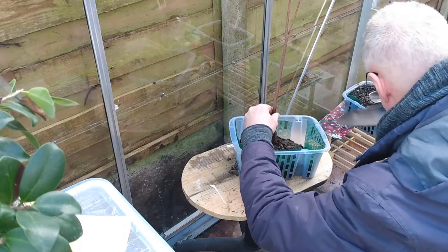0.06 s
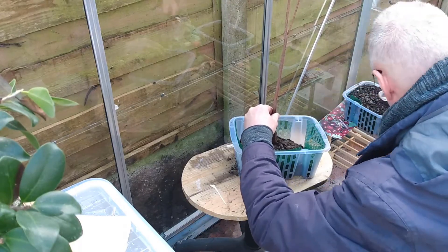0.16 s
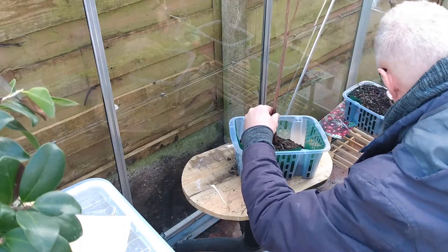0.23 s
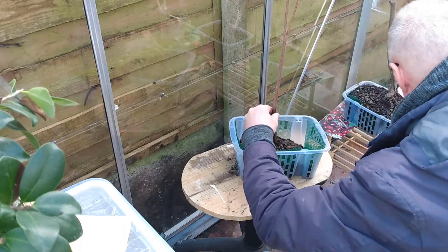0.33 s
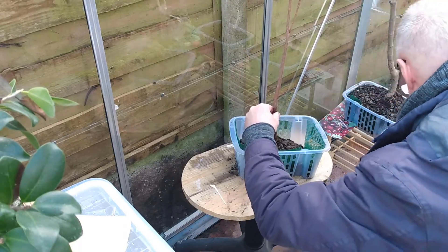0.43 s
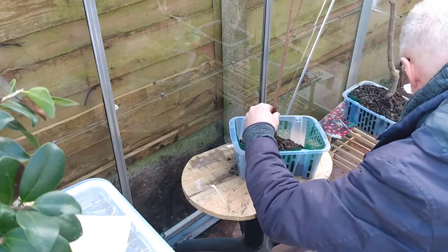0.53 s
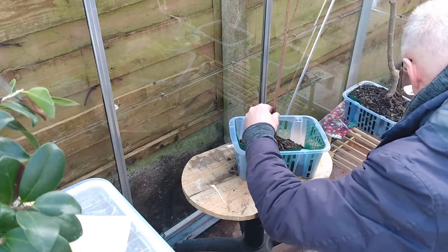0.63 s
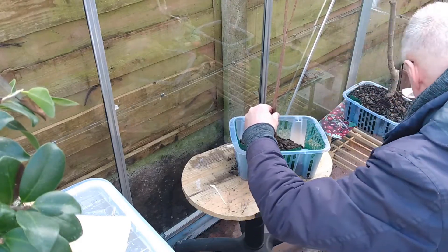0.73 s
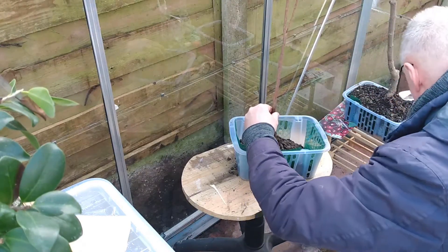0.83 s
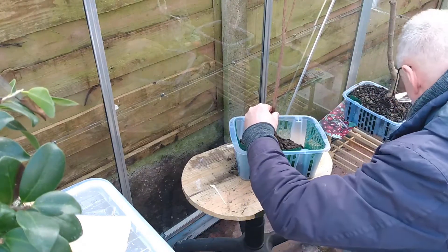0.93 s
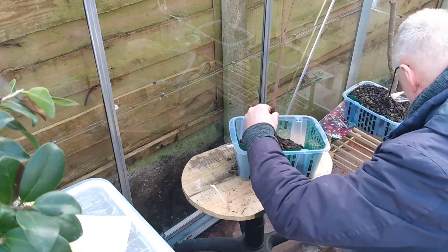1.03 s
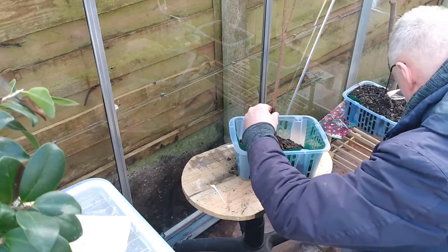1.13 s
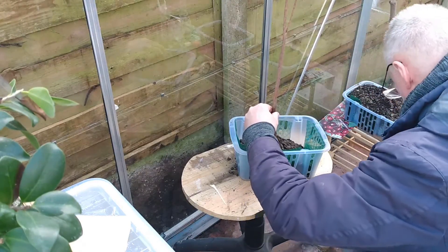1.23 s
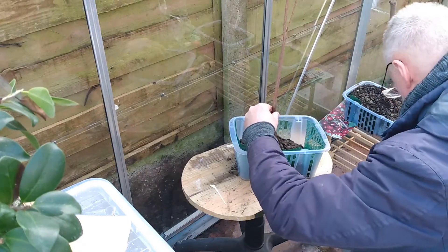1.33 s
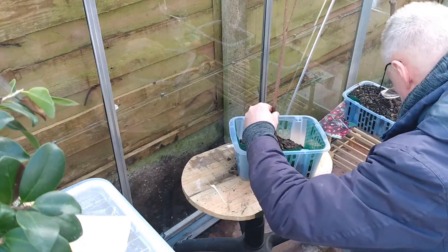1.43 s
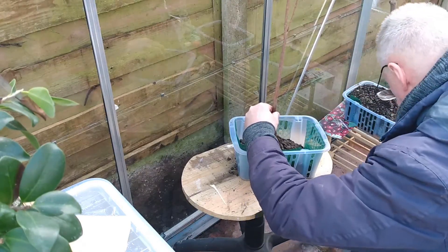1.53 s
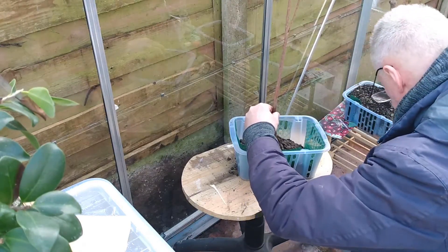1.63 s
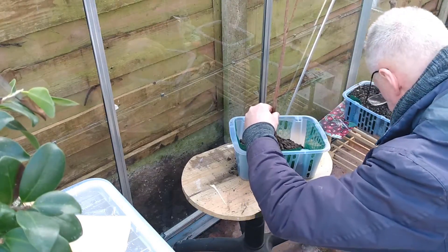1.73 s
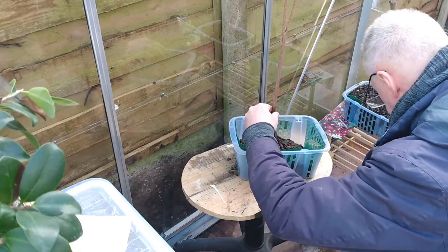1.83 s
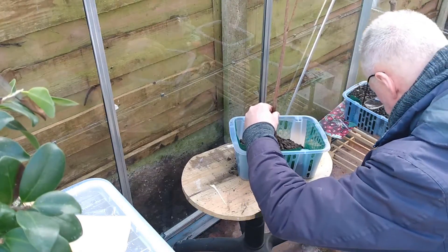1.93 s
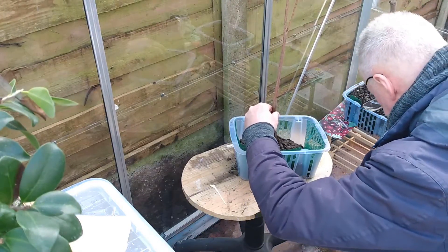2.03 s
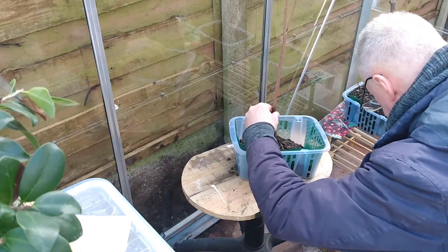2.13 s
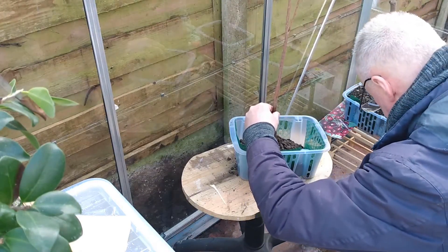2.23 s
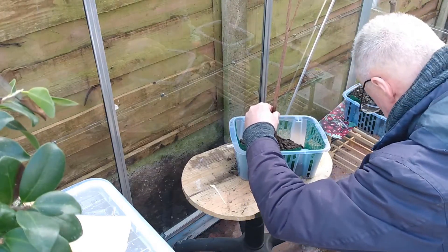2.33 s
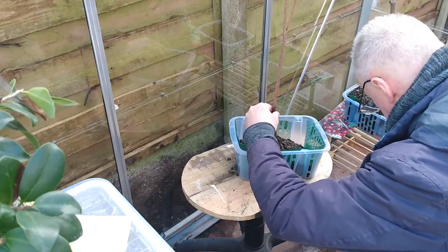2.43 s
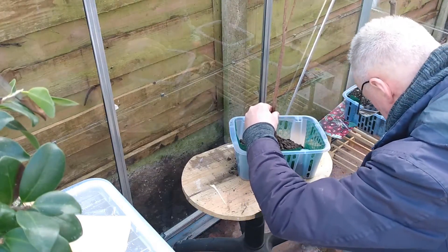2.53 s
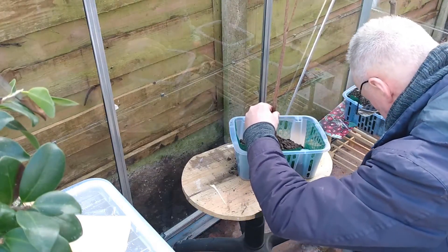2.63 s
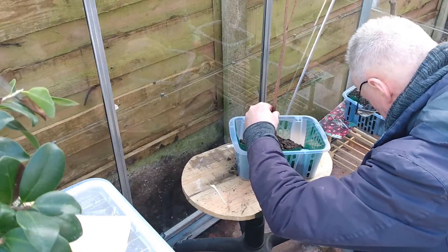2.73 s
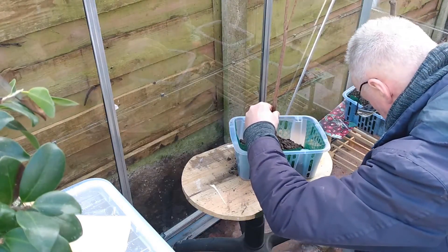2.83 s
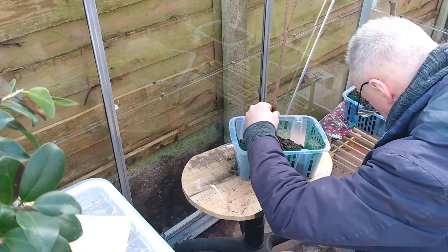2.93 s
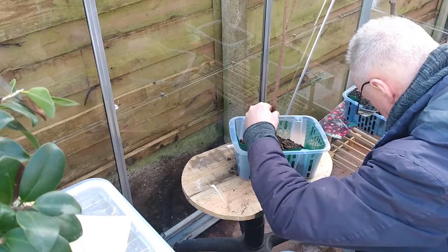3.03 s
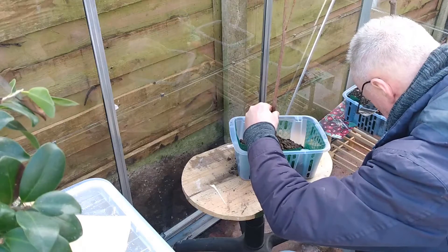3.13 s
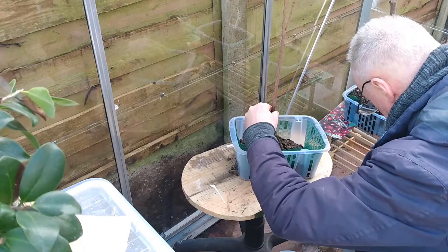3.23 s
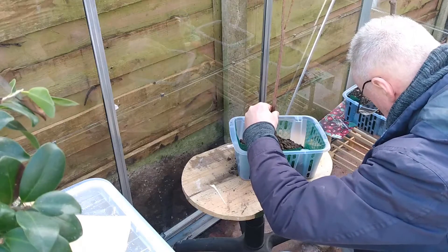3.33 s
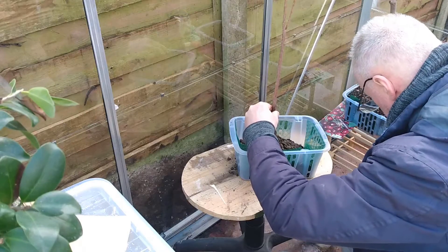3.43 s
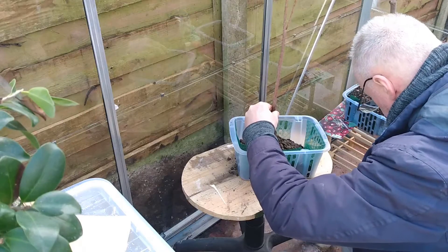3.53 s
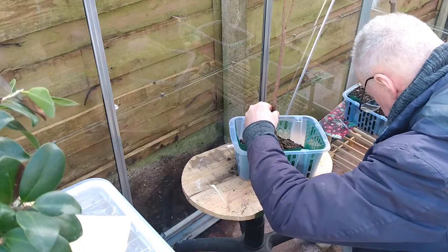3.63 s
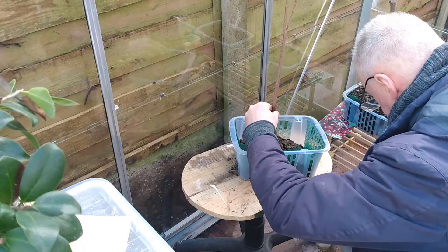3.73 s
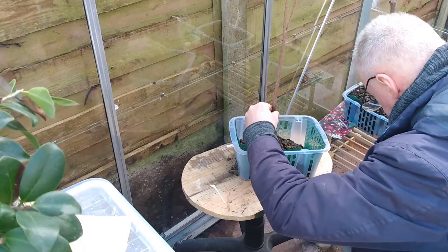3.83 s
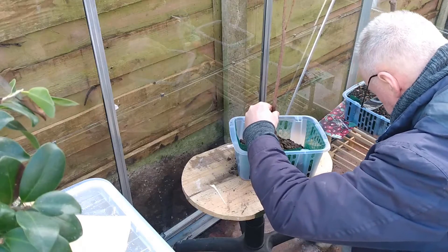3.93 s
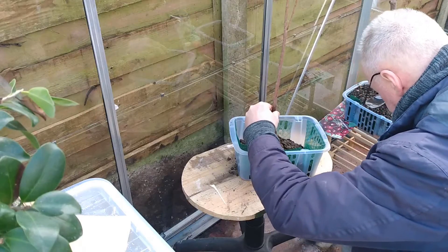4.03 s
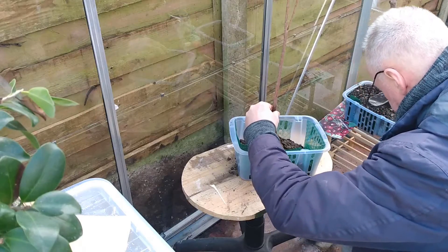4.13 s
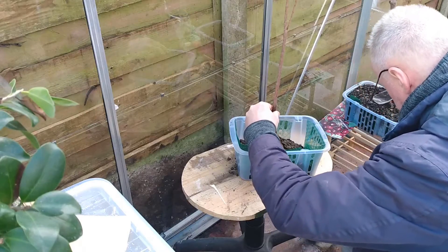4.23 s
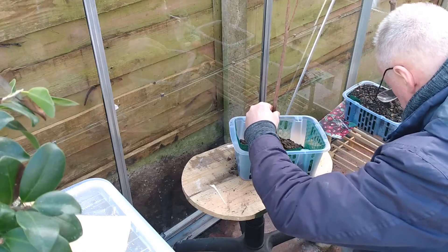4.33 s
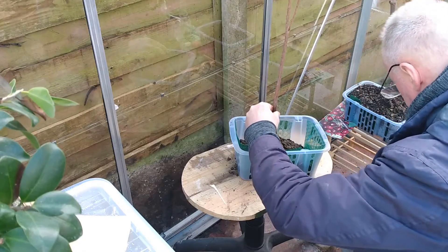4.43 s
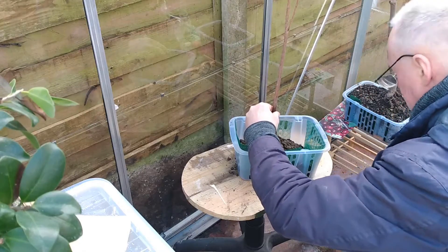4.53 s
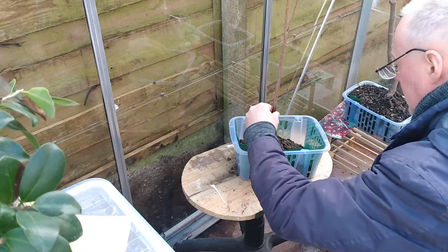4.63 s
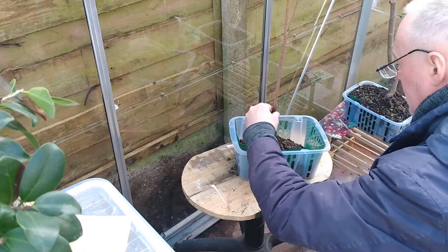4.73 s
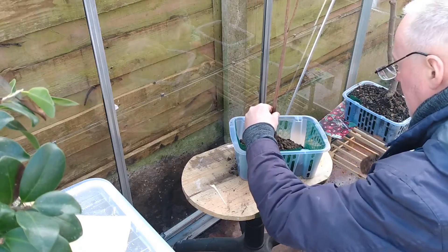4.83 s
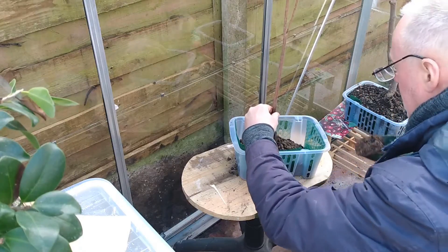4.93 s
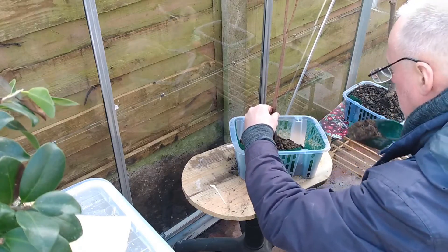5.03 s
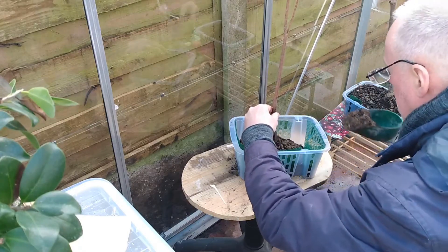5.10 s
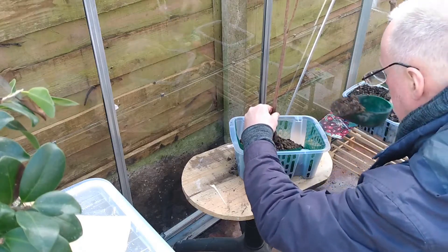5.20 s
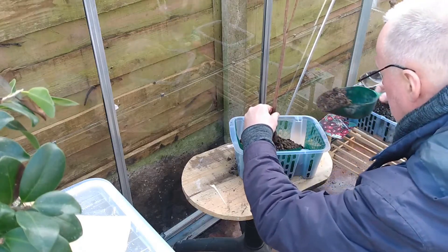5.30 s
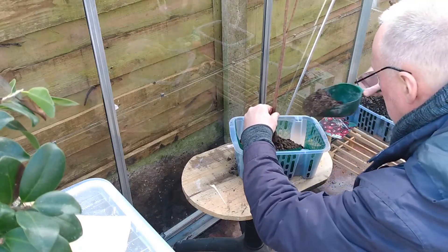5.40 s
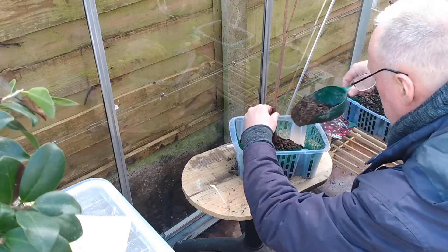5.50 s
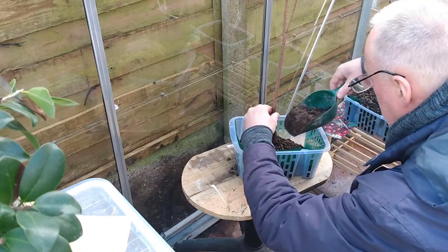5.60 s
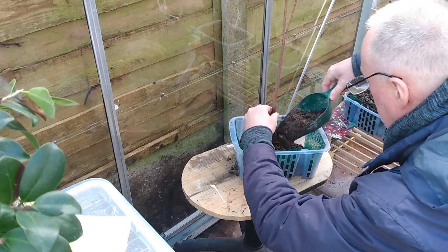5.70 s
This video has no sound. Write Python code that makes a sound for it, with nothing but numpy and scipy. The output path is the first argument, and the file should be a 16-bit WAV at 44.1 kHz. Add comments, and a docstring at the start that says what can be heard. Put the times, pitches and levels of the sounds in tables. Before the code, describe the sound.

A gardener shifts their feet and rubs a sleeve, bumps a plastic basket once, then works a plastic scoop through coarse soil. Dense crunching bursts in the middle give way to lighter, drier grit shifting and sharp plastic taps as the scoop lifts. Stray stones click at the end. Heard fairly close in stereo, in a small, bright-ringing glass enclosure with quiet background rumble.

```python
"""Low rumble, faint air, shuffling feet and a swishing jacket sleeve open the scene in a small glass greenhouse.
A plastic scoop then digs gritty potting soil out of a plastic basket: it taps, knocks and crunches in,
is lifted with grit sliding in its bowl, and sheds a few stones. Bursts of random grains drive resonances
and spectra for soil, soles and cloth; single clicks ring the plastic; stones are short damped sines.
The panes wrap everything except the rumble in a short, bright ring."""
import sys
import numpy as np
from scipy import signal
from scipy.fft import rfft, irfft
from scipy.io import wavfile
from scipy.ndimage import uniform_filter1d

SR = 44100
rng = np.random.default_rng(int(sys.argv[2]) if len(sys.argv) > 2 else 0)


def wrap_up_sound(samples):
    """Save the sound to the file named by the first command line argument, as 16-bit audio."""
    columns = np.atleast_2d(samples).T
    # keep every value between -1 and 1, then stretch to whole-number steps
    tamed = np.clip(columns, -1, 1)
    steps = np.round(tamed * 32767).astype(np.int16)
    wavfile.write(sys.argv[1], SR, steps)


N = 254016
TIME = np.arange(N) / SR
# All level_db columns are relative: each function adds its own trim or normalises the result.


def from_db(db):
    """Decibels to gain."""
    return 10 ** (np.asarray(db) / 20)


def unit(h):
    """Scale a response to an energy of one."""
    return h / np.sqrt(np.sum(h ** 2, axis=-1, keepdims=True) + 1e-30)


def at_hz(points, hz):
    """Read a table along a log-frequency axis."""
    freq_hz, value = np.transpose(points)
    return np.interp(np.log(np.maximum(hz, 1)), np.log(freq_hz), value)


def through(x, response):
    """Pass a sound through an impulse response."""
    return signal.fftconvolve(x, response, axes=-1)[..., :N]


def colour(spectrum, size=4096):
    """Causal (minimum-phase) response with the given spectrum."""
    level_db = at_hz(spectrum, np.fft.rfftfreq(size, 1 / SR))
    cepstrum = irfft(np.log(from_db(level_db)))
    # fold the cepstrum forward so that the energy comes as early as possible
    cepstrum[1:size // 2] *= 2
    cepstrum[size // 2 + 1:] = 0
    return unit(irfft(np.exp(rfft(cepstrum))))


def body(modes):
    """Response of a struck thing: damped sines, each holding its share of the energy."""
    t = TIME[:SR // 4]
    response = np.zeros(len(t))
    for k, (hz, width_hz, db) in enumerate(modes):
        ring = np.exp(-np.pi * width_hz * t) * np.sin(2 * np.pi * hz * t)
        response += (-1) ** k * from_db(db) * unit(ring)  # alternating polarity
    return unit(response)


def cut(x, hz, kind, order=2):
    """Butterworth low- or high-pass."""
    return signal.sosfilt(signal.butter(order, hz, kind, fs=SR, output="sos"), x)


def steadied(x):
    """Even out the level of a ringing sound, to a power of about one."""
    return x / np.sqrt(np.abs(uniform_filter1d(x ** 2, SR // 25)) + 1e-12)


def grains(per_s, spread_db):
    """Random tiny fractures of exponentially spread level, with a local mean power of about one."""
    sizes = from_db(spread_db * np.minimum(rng.exponential(1, N), 4)) * rng.choice([-1, 1], N)
    clicks = sizes * (rng.random(N) < per_s / SR)
    power = np.abs(uniform_filter1d(clicks ** 2, SR // 20))
    return clicks / np.sqrt(power + 0.09 * np.mean(clicks ** 2))


def flicker(depth_db, per_s):
    """A randomly wavering gain with a mean power of one."""
    gain = from_db(depth_db * np.interp(TIME * per_s, np.arange(2000), rng.standard_normal(2000)))
    return unit(gain) * np.sqrt(N)


def gesture(start, rise, hold, release_s):
    """Force of one movement: it builds steadily, holds, then dies away."""
    age = TIME - start
    return np.clip(age / rise, 0, 1) * np.exp(-np.clip((age - rise - hold) / release_s, 0, 20))


def forces(rows, release_s):
    """Add up a table of movements in power: one force curve for each of its level columns."""
    rows = np.array(rows)
    shapes = np.array([gesture(*row[:3], release_s) for row in rows])
    return np.sqrt(from_db(rows[:, 3:].T) ** 2 @ shapes ** 2)


def blows(times, db):
    """One click for each contact."""
    clicks = np.zeros(N)
    clicks[np.round(np.asarray(times) * SR).astype(int)] = from_db(db)
    return clicks


GRAZE_S, GRAZE_DB = .005, -6  # length of the swell, its energy against the click


def grazed(clicks):
    """Lead each click in with a brief swell: grit on the plastic touches just ahead of the blow."""
    ahead = TIME[:SR // 50][::-1]  # time left until the blow
    swell = unit(rng.standard_normal(len(ahead)) * np.clip(1 - ahead / GRAZE_S, 0, 1))
    return clicks + from_db(GRAZE_DB) * signal.fftconvolve(clicks, swell)[len(ahead) - 1:]


# ring of the greenhouse: [pitch_hz, t60_s]
GREENHOUSE_RING = [(100, 0.17), (260, 0.52), (480, 0.49), (760, 0.3), (1800, 0.28), (5000, 0.28),
                   (9000, 0.27), (15000, 0.26)]
# stereo width of the ring: [pitch_hz, left-right likeness (0 unrelated - 1 alike)]
EAR_LIKENESS = [(60, 1), (180, 1), (290, 0.39), (480, 0.49), (800, 0), (2000, 0), (16000, 0.075)]
BUILD_S = 0.00031  # the reflections take a moment to gather


def greenhouse(x, direct_db, left_db):
    """A direct path, then dense reflections from the panes that die away band by band."""
    t, edges = TIME[:SR // 2], np.geomspace(20, 19000, 15)
    white, hz = rfft(rng.standard_normal((2, len(t)))), np.fft.rfftfreq(len(t), 1 / SR)
    response = np.zeros((2, len(t)))
    for low, high in zip(edges, edges[1:]):
        centre = np.sqrt(low * high)
        fade = (1 - np.exp(-t / BUILD_S)) * from_db(-60 * t / at_hz(GREENHOUSE_RING, centre))
        band = irfft(white * ((hz >= low) & (hz < high)), len(t))
        mid, side = unit(band * fade)
        alike = np.clip(at_hz(EAR_LIKENESS, centre), -.99, .99)
        ears = unit(np.sqrt(1 + alike) * mid + np.sqrt(1 - alike) * side * [[1], [-1]])
        response += ears * np.sqrt(2 * (high - low) / SR)
    # the work lies to the right, so the direct sound reaches the left a few samples later
    response[[0, 1], [rng.integers(1, 8), 0]] += from_db(direct_db)
    balance = from_db([[left_db / 2], [-left_db / 2]])
    return through(x[None], unit(response) * balance)


def wandering(x, direct_db, left_db, count):
    """The sounding spot shifts among several places, each with its own pattern of reflections."""
    moments = np.arange(0, 6, 1 / 40)
    shares = np.array([np.interp(TIME, moments, row) for row in rng.standard_normal((count, len(moments)))])
    shares = np.abs(shares) / np.sqrt(np.sum(shares ** 2, axis=0))
    return sum(greenhouse(x * share, direct_db, left_db) for share in shares)


# swell and ebb of the deep rumble: [time_s, level_db]
RUMBLE_LEVEL = [(0.0, -67.5), (1.78, -62), (2.45, -64), (3.06, -75), (3.4, -61), (4.1, -74), (5.76, -75)]
# spectrum of the air, with a thin band of hiss: [pitch_hz, level_db per Hz]
AIR_SPECTRUM = [(30, -16.5), (70, -14), (110, -3.5), (180, -17), (400, -27), (900, -24.5), (1100, -36.5),
                (1250, -3.5), (1400, -16.5), (1650, -34.5), (2000, -35.5), (2300, -24), (2800, -32.5),
                (3200, -23.5), (3700, -45), (16000, -24.5)]
AIR_WAVER_DB, AIR_WAVERS_PER_S = 2.0, 14  # the faint hiss wavers


def background():
    """A deep rumble, alike in both ears, and faint air with a thin band of hiss in it."""
    rumble = cut(cut(rng.standard_normal(N), hz=51.7, kind="low"), hz=36, kind="high", order=3)
    rumble_db = np.interp(TIME, *np.transpose(RUMBLE_LEVEL)) + 1.5
    rumble = unit(rumble) * np.sqrt(N) * from_db(rumble_db)
    air = from_db(-65.5) * through(rng.standard_normal(N), colour(AIR_SPECTRUM))
    air = air * flicker(AIR_WAVER_DB, AIR_WAVERS_PER_S)
    return rumble + greenhouse(air, direct_db=-10, left_db=-2.0)


# shifts of the feet: [start_s, rise_s, hold_s, thud_level_db, scuff_level_db]
FOOT_SHIFTS = [(0.0, 0.0071, 0.031, -49, -65.5), (.095, 0.016, 0.022, -44, -60.5),
               (.155, 0.053, 0.07, -48, -50.5), (.28, 0.024, 0.076, -53, -57.5),
               (.385, 0.0079, 0.021, -48.5, -67), (.735, 0.0053, 0.034, -53, -75),
               (1.39, 0.027, 0.062, -50, -59.5)]
# swishes of the sleeve on the jacket: [start_s, rise_s, hold_s, level_db]
SLEEVE_SWISHES = [(0.0, 0.0033, 0.036, -60), (.15, 0.14, 0.098, -51.5), (.7, 0.071, 0.18, -54.5),
                  (1.0, 0.057, 0.35, -52.5), (1.4, 0.054, 0.032, -45.5), (5.43, 0.059, 0.19, -64)]
# spectra of sole thud, sole scuff and sleeve weave: [pitch_hz, level_db per Hz]
THUD_SPECTRUM = [(20, -27), (45, -7), (70, -22), (110, 6), (170, 1), (260, -14.5), (500, -32), (1200, -53)]
SCUFF_SPECTRUM = [(120, -19.5), (260, -1.5), (450, -0.5), (650, -2), (900, -9), (1500, -15.5),
                  (3000, -23.5), (8000, -54)]
CLOTH_SPECTRUM = [(500, -29), (2000, -2.5), (4500, -1.5), (7000, -1.5), (10000, 4), (13500, 2.5),
                  (16500, -2.5)]
FOOT_RELEASE_S, SLEEVE_RELEASE_S = .035, 0.058


def gardener():
    """Soles thud and scuff on the floor; the weave of the sleeve hisses as it slides."""
    weight, drag = forces(FOOT_SHIFTS, FOOT_RELEASE_S)
    rub, = forces(SLEEVE_SWISHES, SLEEVE_RELEASE_S)
    thud = through(weight * grains(per_s=400, spread_db=-3.0), colour(THUD_SPECTRUM))
    scuff = through(drag * grains(per_s=1500, spread_db=-1.0), colour(SCUFF_SPECTRUM))
    swish = through(rub * grains(per_s=6300, spread_db=-1.5), colour(CLOTH_SPECTRUM))
    return thud + scuff + from_db(-2.5) * swish


# light blows on the scoop: [time_s, crack_level_db, hollow_level_db, wall_level_db]
SCOOP_TAPS = [(1.0059, -31.5, -32.5, -28), (1.1614, -23, -22, -50), (1.6918, -24.5, -40.5, -32.5),
              (1.852, -40, -72, -38.5), (1.9697, -37.5, -26, -23), (2.1625, -9.5, -21, -13),
              (2.4693, -20.5, 0, -14), (2.9061, -17, -14.5, -7.5), (3.3315, -28, -10, -50),
              (3.5802, -31, -9, -51), (4.184, -33, -39, -25), (4.2526, -17.5, -45, -24),
              (4.514, -7.5, -36.5, -15), (4.763, -13, -51, -26), (5.1344, -42, -77, -41)]
# spectrum of crunching grit, also the crack of a tap: [pitch_hz, level_db per Hz]
CRUNCH_SPECTRUM = [(300, -32.5), (900, -5.5), (2000, 5.5), (3500, 1), (5000, 0), (6500, -1), (8500, -0.5),
                   (12000, -3.5), (15000, -3.5), (16500, -26.5)]
# resonances of the free scoop wall, its empty bowl and the basket: [pitch_hz, width_hz, level_db]
FREE_SCOOP_MODES = [(764, 200, -7), (1183, 420, -3), (1520, 130, -0.5), (1817, 250, -4.5),
                    (2280, 490, -0.5), (2910, 160, -5)]
EMPTY_BOWL_MODES = [(446, 18, 2), (227, 25.6, -18.5)]
BASKET_MODES = [(81, 92, -15), (98, 17, -7.5), (156.8, 7, -4), (220.6, 30, -2.5), (271, 14, 0.5),
                (327.3, 27, -0.5), (398, 48, -1), (439.5, 8.2, 0.5)]
FILLED_S = 2.1  # from this moment on the bowl holds soil


def taps():
    """Each blow cracks and rings the scoop wall; the empty bowl sounds hollow, the filled one thumps the basket."""
    s, crack_db, hollow_db, wall_db = np.transpose(SCOOP_TAPS)
    crack = through(grazed(blows(s, crack_db + 15.5)), colour(CRUNCH_SPECTRUM))
    wall = through(grazed(blows(s, wall_db + 17.5)), body(FREE_SCOOP_MODES))
    bowl = through(blows(s, hollow_db + 24) * (TIME < FILLED_S), body(EMPTY_BOWL_MODES))
    thump = through(blows(s, hollow_db + 8.5) * (TIME >= FILLED_S), body(BASKET_MODES))
    return crack + wall + cut(bowl, hz=181, kind="high") + cut(thump, hz=70, kind="high")


# pushes and shakes of the scoop: scrape on its wall, crunch of grit, shove of clods
# [start_s, rise_s, hold_s, scrape_level_db, crunch_level_db, shove_level_db]
SCOOP_PUSHES = [ (1.02, 0.036, 0.031, -46.5, -52.5, -58), (1.48, 0.014, 0.008, -53, -52, -61),
                (1.607, 0.018, 0.019, -35, -46, -47), (1.67, 0.016, 0.014, -41.5, -47.5, -45.5),
                (1.78, 0.013, 0.07, -53.5, -52.5, -79), (1.961, 0.014, 0.064, -36.5, -34.5, -33),
                (2.04, 0.061, 0.028, -30.5, -26, -33.5), (2.135, 0.029, 0.029, -30.5, -32, -25),
                (2.23, 0.037, 0.039, -24, -26.5, -27.5), (2.35, 0.04, 0.097, -44.5, -52.5, -34.5),
                (2.463, 0.0068, 0.088, -21.5, -19.5, -23), (2.57, 0.031, 0.099, -31, -35, -30),
                (2.69, 0.083, .06, -28, -33.5, -47), (2.775, 0.064, .05, -23, -25, -33.5),
                (2.92, 0.054, 0.2, -33.5, -39, -49), (3.12, 0.022, 0.14, -31.5, -36, -41),
                (3.305, 0.021, 0.078, -37, -32.5, -31.5), (3.43, 0.025, 0.028, -30, -30.5, -32),
                (3.577, 0.005, 0.037, -35, -32, -30.5), (3.63, 0.059, 0.13, -36.5, -34.5, -38.5),
                (3.83, 0.047, 0.015, -21, -23, -30), (3.91, 0.033, 0.12, -42.5, -39.5, -43.5),
                (4.1, 0.03, 0.092, -40.5, -37, -54), (4.235, 0.023, 0.046, -35, -34, -47.5),
                (4.315, 0.017, 0.08, -32.5, -29, -46), (4.415, 0.023, .012, -31, -21.5, -42.5),
                (4.505, .012, 0.068, -35, -39, -42.5), (4.62, 0.054, 0.12, -51.5, -45.5, -69),
                (4.754, 0.011, .017, -30.5, -35, -57), (4.805, 0.013, 0.014, -41, -27.5, -49.5),
                (4.926, .01, 0.0053, -30, -31.5, -59), (4.958, .012, 0.014, -62, -48.5, -49), ]
PUSH_RELEASE_S = .012  # the soil settles this fast once a push ends


def pushes():
    """Forces of scraping, crunching and shoving as the scoop works the soil."""
    return forces(SCOOP_PUSHES, PUSH_RELEASE_S)


# how far the scoop is out of the soil: [time_s, freedom (0 buried - 1 free with loose grit in its bowl)]
SCOOP_LIFT = [(1.6, 0.35), (2.35, 0.19), (3.2, 0.27), (3.38, 0.45), (3.88, 0.6), (4.15, 1)]


def freedom():
    """Share of the scoop that is clear of the soil, at every moment."""
    return np.clip(np.interp(TIME, *np.transpose(SCOOP_LIFT)), 0, 1)


# resonances of the scoop wall in the soil: [pitch_hz, width_hz, level_db]
BURIED_SCOOP_MODES = [(598, 110, -6.5), (696, 13, 3.5), (780, 320, 1.5), (1134, 100, -5), (1215, 97, 2.5),
                      (1340, 240, -1), (1826, 71, -22), (2250, 570, -11.5), (2734, 110, -11)]
# spectrum of loose grit sliding in the bowl: [pitch_hz, level_db per Hz]
SLIDE_SPECTRUM = [(400, -20), (1500, -15), (3200, 2), (4200, 0), (5000, 1.5), (5600, 4), (6500, 5),
                  (7600, -1.5), (10000, -8), (13000, -6.5), (16500, -32)]
CLUMP_DB, CLUMPS_PER_S = 3.5, 110  # the soil gives way crumb by crumb


def digging(scraping, crunching):
    """Stones catch on the scoop wall, and grit crunches under it or slides in its bowl."""
    free, give = freedom(), flicker(CLUMP_DB, CLUMPS_PER_S)
    scrape = from_db(1.0) * scraping * give * grains(per_s=920, spread_db=2.5)
    crunch = from_db(1.5) * crunching * give * grains(per_s=1400, spread_db=3.5)
    buried = through(scrape, body(BURIED_SCOOP_MODES)) + through(crunch, colour(CRUNCH_SPECTRUM))
    loose = through(scrape, body(FREE_SCOOP_MODES)) + through(crunch, colour(SLIDE_SPECTRUM))
    return cut(np.sqrt(1 - free) * buried + np.sqrt(free) * loose, hz=408, kind="high")


# resonances of the bowl full of soil: [pitch_hz, width_hz, level_db]
LADEN_BOWL_MODES = [(225, 38, -5), (365, 41, 5.5), (430, 40, 9.5)]


def heaving(shoving):
    """Clods shove the basket; once the scoop is quite clear of it, they only sound the laden bowl."""
    clear = freedom() ** 8  # stays near zero until the scoop is almost out
    clods = grains(per_s=1400, spread_db=1.5)
    basket = steadied(cut(through(clods, body(BASKET_MODES)), hz=70, kind="high"))
    bowl = steadied(cut(through(clods, body(LADEN_BOWL_MODES)), hz=150, kind="high"))
    return shoving * (np.sqrt(1 - clear) * basket + np.sqrt(clear) * bowl)


# the scoop hits the basket: [time_s, level_db]
BASKET_KNOCK = [(1.204, -2.5)]
# resonances of the basket rim: [pitch_hz, width_hz, level_db]
RIM_MODES = [(224.6, 36, -14), (444, 8.9, -8), (592, 84, -7), (734, 30, -3), (887, 100, -4.5),
             (975, 110, -2), (1580, 140, -0.5), (1790, 180, -5), (2160, 160, -3.5), (2670, 166, -6.5),
             (2880, 180, -8.5), (3570, 420, -12.5)]


def knock():
    """Soft plastic on plastic: the contact lasts long enough to dull the treble, and the basket thumps faintly."""
    s, db = np.transpose(BASKET_KNOCK)
    click = blows(s, db + 19.5)
    rim = through(grazed(click), body(RIM_MODES))
    rim = cut(cut(rim, hz=3725, kind="low"), hz=170, kind="high")
    thump = from_db(-20.5) * through(click, body(BASKET_MODES))
    contact = from_db(-14) * cut(click, hz=4480, kind="low", order=1)
    return rim + thump + contact


# single stones that skip on the plastic: [time_s, level_db, pitch_hz]
STONE_SKIPS = [(4.6676, -34.5, 10800), (4.764, -13, 7600), (4.78, -25.5, 8000), (4.984, -31.5, 14200),
               (5.1317, -31, 14800), (5.176, -45, 11760), (5.238, -48, 12800), (5.2718, -59, 11600)]


def stones(width_hz):
    """A hard stone gives one bright tick, damped within a millisecond."""
    ticks = np.zeros(N)
    for s, db, hz in STONE_SKIPS:
        tick = from_db(db + 25.5) * body([(hz, width_hz, 0)])[:SR // 100]
        start = round(s * SR)
        ticks[start:start + len(tick)] += tick
    return cut(ticks, hz=3570, kind="high")


def scene():
    """The basket stands still while scoop and gardener move; all share the greenhouse."""
    person = wandering(gardener(), direct_db=-3.5, left_db=-2.5, count=2)
    scraping, crunching, shoving = pushes()
    scoop = wandering(digging(scraping, crunching) + taps(), direct_db=-16.5, left_db=-1.3, count=7)
    basket = greenhouse(heaving(shoving), direct_db=2.0, left_db=-1.4)
    bump = greenhouse(knock(), direct_db=-4.5, left_db=-1.5)
    spill = greenhouse(stones(width_hz=5200), direct_db=-11, left_db=-2.5)
    return background() + person + scoop + basket + bump + spill


CUTOFF_HZ = 16000


def record(dry):
    """The highest peaks are rounded and the top is cut steeply."""
    rounded = .9 * np.tanh(dry / .9)
    steep = signal.ellip(12, .1, 80, CUTOFF_HZ, fs=SR, output="sos")
    return signal.sosfilt(steep, rounded)


dry = scene()
out = record(dry)
wrap_up_sound(out)
```